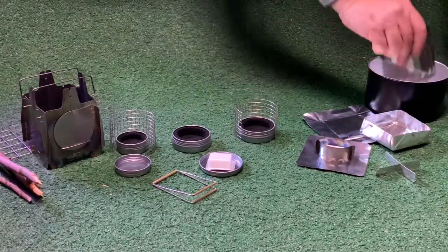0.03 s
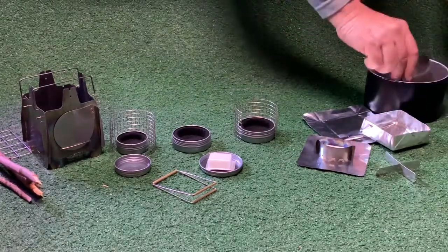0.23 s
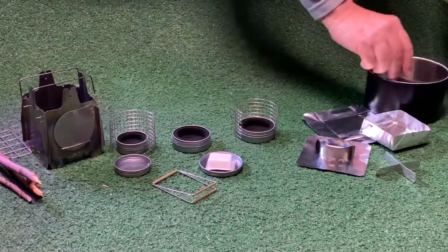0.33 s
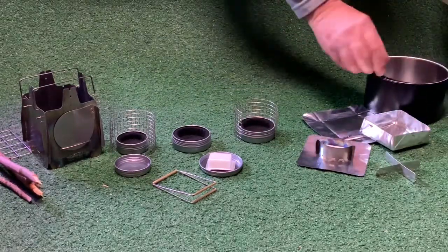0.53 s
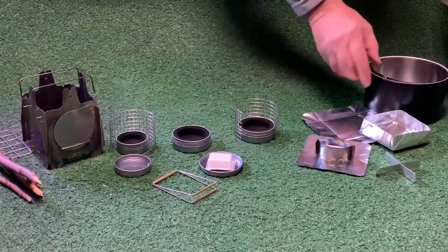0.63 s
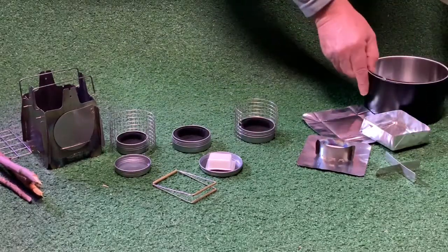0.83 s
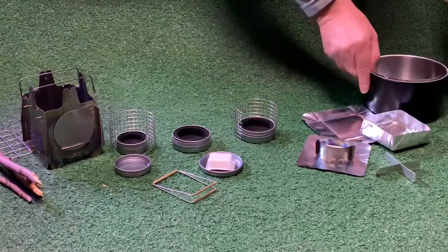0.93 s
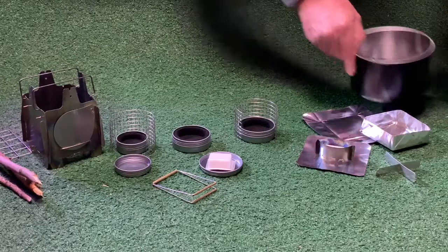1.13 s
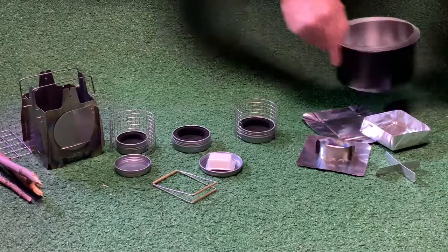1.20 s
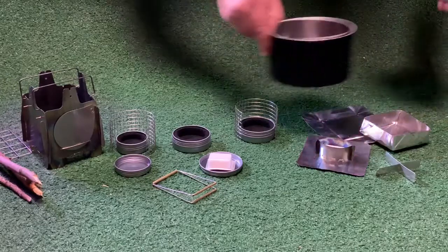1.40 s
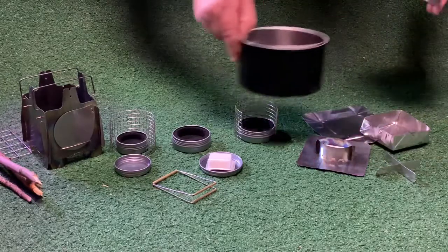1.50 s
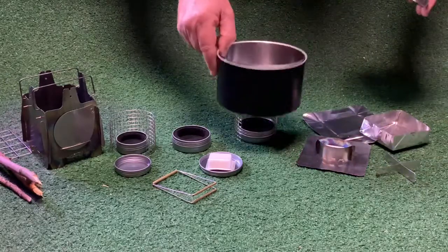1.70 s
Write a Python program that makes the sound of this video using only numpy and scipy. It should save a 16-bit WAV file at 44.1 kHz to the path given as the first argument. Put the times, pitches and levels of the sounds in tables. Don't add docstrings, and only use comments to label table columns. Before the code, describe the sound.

Thin metal panels drop into a hand-held pot: a dull knock with small bounces, a bright ringing clatter with scraping, a sharp tick, then faint handle taps and rustling, close-miked in a quietly humming room.

```python
import sys
import numpy as np
from scipy import signal
from scipy.fft import rfft, irfft
from scipy.io import wavfile
from scipy.ndimage import uniform_filter1d

SR = 44100
rng = np.random.default_rng(int(sys.argv[2]) if len(sys.argv) > 2 else 0)


def dump_mix(stems):
    frames = np.atleast_2d(stems).T
    limited = np.clip(frames, -1, 1)
    pcm = np.round(limited * 32767).astype(np.int16)
    wavfile.write(sys.argv[1], SR, pcm)


def natural_amplitude(level_db):
    exponent = np.asarray(level_db, float) / 20
    return 10 ** exponent


N = 77175

# freq_hz, density_db
AIR_COLOUR = [(20, -13), (55, -2.5), (130, -7.5), (200, -18.5), (550, -21), (1000, -29.5), (4000, -43),
              (16000, -61)]
# pitch_hz, width_hz, level_db
HUMS = [(74.8, 16, -56), (110, 18, -53), (212.3, 8, -65.5)]
# time_s, gain_db
HUM_SWELL = [(0, 12.5), (.1, -0.5), (.3, 9), (.5, 3.5), (.6, 1.5), (1.2, -7.5), (1.6, -1), (1.75, 5)]
# freq_hz, t60_s
ROOM_DECAY = [(300, 0.25), (1000, 0.1), (3000, 0.25), (8000, 0.12), (15000, .2)]
# time_s, level_db
RUSTLE_LEVEL = [(0, -65.5), (.18, -64), (.3, -71.5), (.6, -84), (.735, -74), (.75, -53.5), (.81, -62.5),
                (.84, -59), (.88, -65.5), (.915, -59), (.98, -66.5), (1.02, -74), (1.3, -100), (1.47, -70),
                (1.58, -71.5), (1.655, -73), (1.68, -63), (1.74, -79.5)]
# freq_hz, density_db
RUSTLE_COLOUR = [(500, -19), (1200, -8.5), (2500, -8.5), (5500, -11), (8000, -15.5), (11000, -18),
                 (16000, -12.5)]
# centre_hz, width_hz, level_db
SLIDE_BANDS = [(2390, 230, -79), (4900, 980, -73), (6420, 920, -73)]
# time_s, level_db
SCRAPE_LEVEL = [(.197, -56), (.21, -41), (.25, -50.5), (.3, -47), (.335, -40), (.39, -43), (.45, -56.5),
                (.5, -53), (.6, -86.5)]
# freq_hz, density_db
SCRAPE_COLOUR = [(200, -26.5), (600, -2.5), (1500, -10.5), (4200, -1), (7000, -4), (10000, -6.5),
                 (14000, -7.5), (16000, -6)]
# start_s, level_db, contact_hz
HANDLE_TAPS = [
    (.746, -45, 960),
    (.748, -48, 2200),
    (.752, -47, 3300),
    (.79, -55, 930),
    (.84, -56, 3400),
    (.944, -68, 2950),
    (.995, -58, 3950),
]
# pitch_hz, level_db, t60_s
HANDLE_MODES = [(937, 4.5, 0.054), (1657, 8, 0.05), (2096, -1, 0.059), (2390, -1, 0.064), (3120, -5, 0.077),
                (3283, -3.5, 0.061), (4000, -16, 0.062), (4730, -2, 0.051)]
# start_s, level_db, contact_hz
DEEP_BLOWS = [(.204, -25, 270), (0.25, -30.5, 520), (.203, -23.5, 7100), (.243, -36.5, 5800),
              (.34, -36, 810), (.338, -32, 4000), (.3311, -5.5, 4400), (.364, -29.5, 6100),
              (.46, -23, 4790), (.462, -38, 690), (0.44, -47, 620)]
# pitch_hz, level_db, t60_s
RIM_MODES = [(288.3, -3, 0.046), (520, -8, 0.042), (633, -1.5, 0.12), (4370, 0.5, 0.0042),
             (4925, -9, 0.052), (5750, -3.5, 0.095), (6390, 1, .06), (6740, -4, 0.18), (7400, -3.5, .05),
             (7890, -4.5, 0.076)]
# start_s, stop_s, pitch_hz, last_pitch_hz
PANELS = [(.204, .243, 545, 510), (.2025, .216, 1003, 1000), (.203, .216, 2983, 2983),
          (.2035, .214, 1195, 1195), (.262, .279, 990, 990), (.3245, .334, 990, 985),
          (.325, .333, 500, 500), (.335, .35, 725, 720), (.339, .361, 2990, 2982), (.364, .384, 2965, 2965),
          (.388, .412, 2960, 2955), (.341, .46, 2064, 2062), (.342, .44, 2219, 2217),
          (.358, .427, 987, 981), (.944, .972, 2985, 2985), (.336, .4, 3780, 3776), (.337, .36, 3962, 3956),
          (.345, .4, 3450, 3446), (.355, .385, 4688, 4688), (.34, .385, 4946, 4944),
          (.334, .348, 2483, 2480), (.4, .45, 1570, 1560)]
PANEL_DB = [-24.5, -19.5, -29, -28, -33, -17.5, -30, -28.5, -15, -30, -22, -19, -23, -26, -63, -31, -26.5,
            -31.5, -29, -34.5, -24, -38.5]
# start_s, level_db, centre_hz
SNAPS = [
    (0.2045, -24.5, 13000),
    (.3388, -37, 13500),
    (.3405, -42, 7440),
    (.4597, -27.5, 10100),
    (0.462, -25, 14500),
    (.364, -30, 4780),
    (0.751, -70, 13000),
]
# start_s, pot_level_db, sheet_level_db, crack_level_db, contact_hz
CONTACTS = [(0.197, -45.5, -64, -39.5, 4000), (.2025, -15.5, -61, -17, 2660), (.2045, -24, -32.5, -26, 903),
            (.209, -18.5, -41.5, -28.5, 1310), (0.215, -28, -62.5, -26.5, 2300),
            (0.225, -40, -53.5, -40.5, 3500), (0.242, -27.5, -39, -47.5, 1070),
            (.256, -35, -50.5, -33, 3000), (.266, -41, -35, -45.5, 795), (.281, -29.5, -38, -38, 930),
            (.325, -23.5, -21, -28.5, 760), (.3317, -32, -43, -18.5, 4000), (.339, -14, -26, -14.5, 4000),
            (.343, -18.5, -18.5, -33, 2460), (.361, -18, -21, -22.5, 1600), (.378, -53, -24, -24, 4530),
            (.388, -48.5, -29, -43, 2940), (.4597, -52, -54, -23.5, 7000), (.463, -53, -58, -29.5, 5300),
            (0.488, -51.5, -48, -59, 1510), (0.749, -54.5, -70, -47, 2000), (.785, -63, -74, -55, 2000),
            (.84, -57, -79, -68, 3000), (.975, -73, -72.5, -55.5, 921)]
# pitch_hz, level_db, t60_s
POT_MODES = [(710, -23, 0.029), (992, 0.5, 0.052), (1206, -10.5, .04), (1503, 4, 0.055), (1590, -8, 0.04),
             (2395, -9.5, 0.056), (2640, -13, 0.053), (3856, -4.5, .05), (3940, -10.5, .04),
             (6680, -8.5, 0.031), (7537, -3.5, .04)]
# pitch_hz, level_db, t60_s
SHEET_MODES = [(956, -17.5, .3), (2040, -20.5, 0.42), (2144, -15, 0.22), (2890, -20.5, .2),
               (1375, -11, 0.098), (1485, -11.5, .14), (1686, -10.5, 0.15), (2481, -6.5, 0.065),
               (2697, -12.5, .08), (3460, -14.5, .1), (3786, -9.5, .1), (3900, -8, .06), (4900, -14, .06),
               (5750, -17, .06)]
# freq_hz, gain_db
MIC_RESPONSE = [(100, 0.5), (6000, 1), (8500, -2.5), (10500, -8.5), (12500, -6.5), (14500, -3.5),
                (15700, -7)]


def evened(x):
    return x / np.sqrt(np.mean(x ** 2) + 1e-20)


def read_spectrum(points, hz):
    f, value = np.transpose(points)
    return np.interp(np.log(hz + 1), np.log(f + 1), value)


def gain_curve(points):
    s, db = np.transpose(points)
    return natural_amplitude(np.interp(np.arange(N) / SR, s, db, left=-120, right=-120))


def colour(x, points):
    hz = np.fft.rfftfreq(len(x), 1 / SR)
    return irfft(rfft(x) * natural_amplitude(read_spectrum(points, hz)), len(x))


def bump(hz, centre_hz, octaves):
    return np.exp(-.5 * (np.log2((hz + 1) / centre_hz) / octaves) ** 2)


def resonate(x, hz, width_hz):
    turn = np.exp(2j * np.pi * hz * np.arange(len(x)) / SR)
    r = np.exp(-np.pi * width_hz / SR)
    return 2 * (turn * signal.lfilter([1 - r], [1, -r], x / turn)).real


def ring(x, hz, t60_s):
    width_hz = np.log(1000) / np.pi / t60_s
    return resonate(x, hz, width_hz) / (2 - 2 * np.exp(-np.pi * width_hz / SR))


def air():
    noise = natural_amplitude(-50) * evened(colour(rng.standard_normal(N), AIR_COLOUR))
    hums = []
    for hz, width_hz, db in HUMS:
        once = resonate(rng.standard_normal(N), hz, width_hz)
        hums.append(natural_amplitude(db) * evened(resonate(once, hz, width_hz)))
    hiss_hz = 11860
    hiss = natural_amplitude(-85.5) * evened(colour(rng.standard_normal(N), [(hiss_hz / 2, -20), (hiss_hz, 0)]))
    return noise + hums[0] + gain_curve(HUM_SWELL) * hums[1] + hums[2] + hiss


def room(x):
    gap_s = 0.0014
    taps = np.zeros(SR // 2)
    at = np.arange(0, len(taps) - 10, 10)
    taps[at + rng.integers(0, 10, len(at))] = rng.choice([-1., 1.], len(at))
    hz, t, z = signal.stft(taps, SR, nperseg=256)
    decay = natural_amplitude(-60 * t / read_spectrum(ROOM_DECAY, hz)[:, None])
    tail = signal.istft(z * decay, SR, nperseg=256)[1]
    tail = tail * np.clip(np.arange(len(tail)) / SR / gap_s, 0, 1)
    return signal.fftconvolve(x, tail / np.linalg.norm(tail))[:N]


def grit():
    slips_per_s, spread_db = 5000, 3
    size = natural_amplitude(spread_db * np.minimum(rng.exponential(1, N), 4)) * rng.choice([-1., 1.], N)
    return evened(size * (rng.random(N) < slips_per_s / SR) + 0.9 * rng.standard_normal(N))


def rustle():
    return gain_curve(RUSTLE_LEVEL) * evened(colour(grit(), RUSTLE_COLOUR))


def slide():
    end_s, fade_s = .2, 0.012
    bands = np.zeros(N)
    for hz, width_hz, db in SLIDE_BANDS:
        bands += natural_amplitude(db) * evened(resonate(rng.standard_normal(N), hz, width_hz))
    return bands * np.clip((end_s - np.arange(N) / SR) / fade_s, 0, 1)


def scrape(slips):
    return natural_amplitude(11.5) * gain_curve(SCRAPE_LEVEL) * evened(colour(slips, SCRAPE_COLOUR))


def ringing_body(modes, blows, octaves, chatter, feed):
    rattle_s, chatter_s, same_side_hz = 0.00067, .004, 2800
    out, t = np.zeros(N), np.arange(600) / SR
    push = t / rattle_s * np.exp(-t / rattle_s)
    push = push / push.sum()
    span = round(chatter_s * SR)
    side = rng.choice([-1., 1.], (len(blows), len(modes)))
    for k, (hz, db, t60_s) in enumerate(modes):
        drive = feed.copy()
        for (s, blow_db, centre_hz), sign in zip(blows, side[:, k]):
            at = round(s * SR)
            height = 2 * natural_amplitude(blow_db) * bump(hz, centre_hz, octaves)
            if hz < same_side_hz:
                height = height * sign
            drive[at:at + 600] += height * push * np.sin(2 * np.pi * hz * t)
        smooth = uniform_filter1d(rng.standard_normal(N), span)
        waver = evened(uniform_filter1d(smooth, span))
        out += natural_amplitude(db) * ring(drive, hz, t60_s) * (1 + chatter * waver)
    return out


def handle():
    return ringing_body(HANDLE_MODES, HANDLE_TAPS, .2, 0.58, np.zeros(N))


def rim():
    return ringing_body(RIM_MODES, DEEP_BLOWS, .17, 0.18, np.zeros(N))


def panels():
    rise_s, mute_s, t60_s = .002, .003, .25
    out, t = np.zeros(N), np.arange(N) / SR
    for (start, stop, hz, last_hz), db in zip(PANELS, PANEL_DB):
        u = np.maximum(t - start, 0)
        pitch_hz = hz + (last_hz - hz) * np.minimum(u / (stop - start), 1)
        swell = (1 - np.exp(-u / rise_s)) * natural_amplitude(db - 60 * u / t60_s)
        mute = np.exp(-np.maximum(t - stop, 0) / mute_s)
        out += swell * mute * np.sin(2 * np.pi * np.cumsum(pitch_hz) / SR)
    return out


def snaps():
    octaves, t60_s = .35, .03
    out, t, hz = np.zeros(N), np.arange(4096) / SR, np.fft.rfftfreq(4096, 1 / SR)
    for s, db, centre_hz in SNAPS:
        at = round(s * SR)
        noise = rng.standard_normal(4096)
        burst = evened(irfft(rfft(noise) * bump(hz, centre_hz, octaves)))
        out[at:at + 4096] += natural_amplitude(db - 60 * t / t60_s) * burst
    return out


def cracks():
    rise_s, burst_t60_s, tick_t60_s, tick_db = 0.00024, 0.052, 0.0022, 9.5
    burst_oct, burst_skirt_db = 0.25, -12
    low_hz, top_hz, spread_db = 599.8, 15730, 2
    jingle_db, jingle_t60_s, jingle_oct, jingle_skirt_db = -1, 0.14, 0.92, -8
    out, t, hz = np.zeros(N), np.arange(8192) / SR, np.fft.rfftfreq(8192, 1 / SR)
    rise = np.minimum(t / rise_s, 1)
    fall = natural_amplitude(-60 * t / burst_t60_s) + natural_amplitude(tick_db - 60 * t / tick_t60_s)
    spots = rng.random((220, 2))
    fine_hz = low_hz + (top_hz - low_hz) * spots[:, 0] ** 1.4
    fine_t60_s = jingle_t60_s * (.5 + spots[:, 1]) * (3000 / fine_hz) ** 0.43
    turn, dying = 2 * np.pi * fine_hz[:, None] * t, natural_amplitude(-60 * t / fine_t60_s[:, None])
    sines, cosines = dying * np.sin(turn), dying * np.cos(turn)
    for s, _, _, db, centre_hz in CONTACTS:
        noise = rng.standard_normal(8192)
        a, b, c = rng.standard_normal((3, 220))
        shape = bump(hz, centre_hz, burst_oct) + natural_amplitude(burst_skirt_db) * (hz > 250)
        burst = evened(irfft(rfft(noise) * shape))
        weight = bump(fine_hz, centre_hz, jingle_oct) + natural_amplitude(jingle_skirt_db)
        weight = weight * natural_amplitude(spread_db * np.clip(c, -3, 1.2))
        jingle = (weight * a @ sines + weight * b @ cosines) / np.linalg.norm(weight)
        at = round(s * SR)
        out[at:at + 8192] += natural_amplitude(db - 6) * rise * (fall * burst + natural_amplitude(jingle_db) * jingle)
    return out


def sheets(feed):
    settle_s, free_again_s, settle_db_per_s = 0.4496, .7, 76
    t = np.arange(N) / SR
    settle = natural_amplitude(-settle_db_per_s * np.maximum(t - settle_s, 0) * (t < free_again_s))
    blows = np.array(CONTACTS)[:, [0, 2, 4]]
    return settle * ringing_body(SHEET_MODES, blows, 0.73, 0.58, feed)


def pot(feed):
    blows = np.array(CONTACTS)[:, [0, 1, 4]]
    return ringing_body(POT_MODES, blows, 0.73, 0.18, feed)


def scene():
    slips = grit()
    feed = natural_amplitude(-34.5) * gain_curve(SCRAPE_LEVEL) * slips
    quiet = air() + rustle() + slide() + scrape(slips)
    metal = handle() + rim() + panels() + snaps() + cracks() + sheets(feed) + pot(feed)
    return (metal + natural_amplitude(-13) * room(metal) + quiet)[None]


def top_cut(x):
    return signal.sosfilt(signal.butter(12, 16990, fs=SR, output="sos"), x)


def record(dry):
    edge = signal.firwin(801, 15830, window=("kaiser", 5), fs=SR)
    mix = signal.oaconvolve(colour(dry[0], MIC_RESPONSE), edge, "same")[None]
    return top_cut(mix)


dry = scene()
out = record(dry)
dump_mix(out)
```